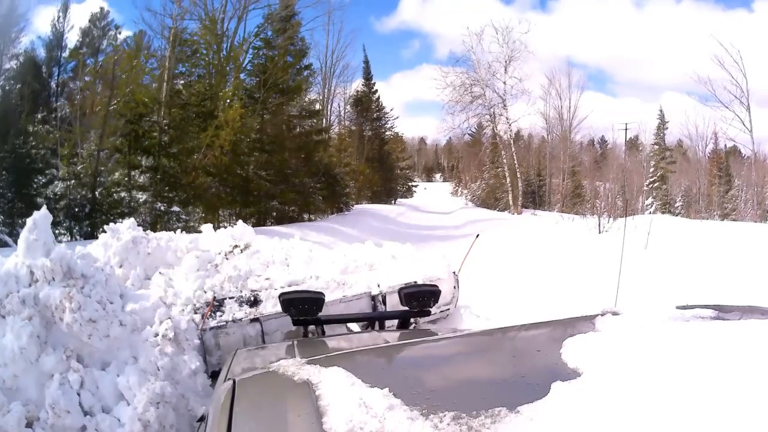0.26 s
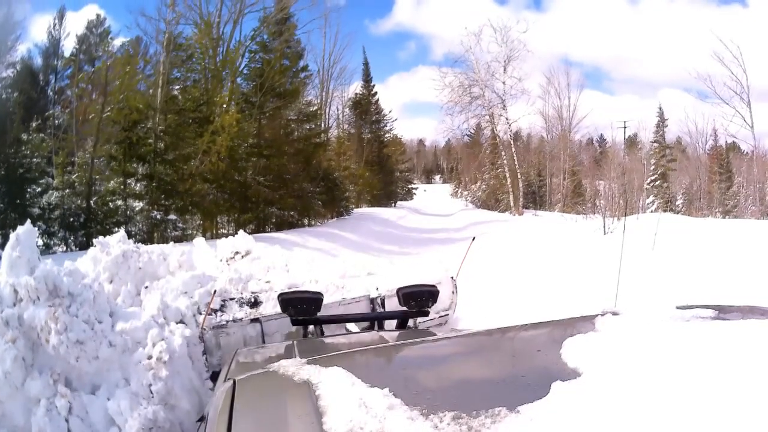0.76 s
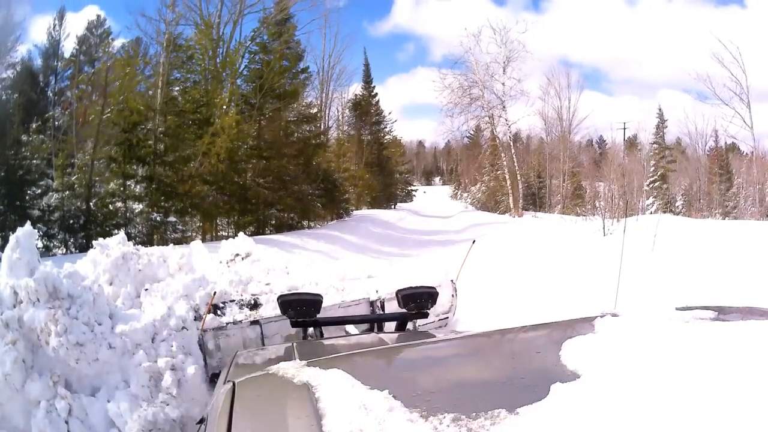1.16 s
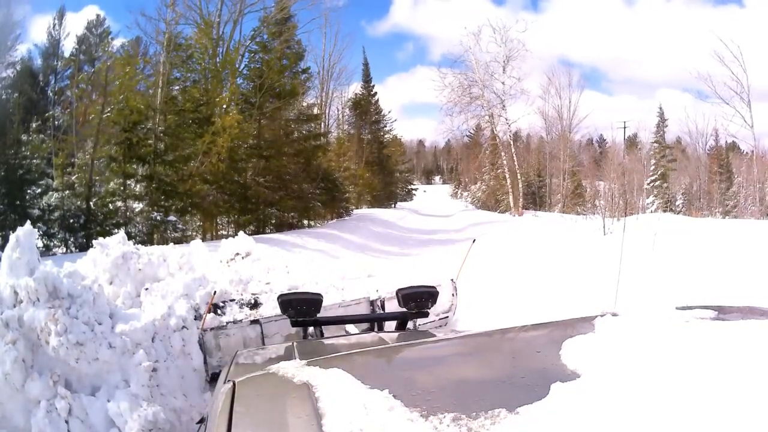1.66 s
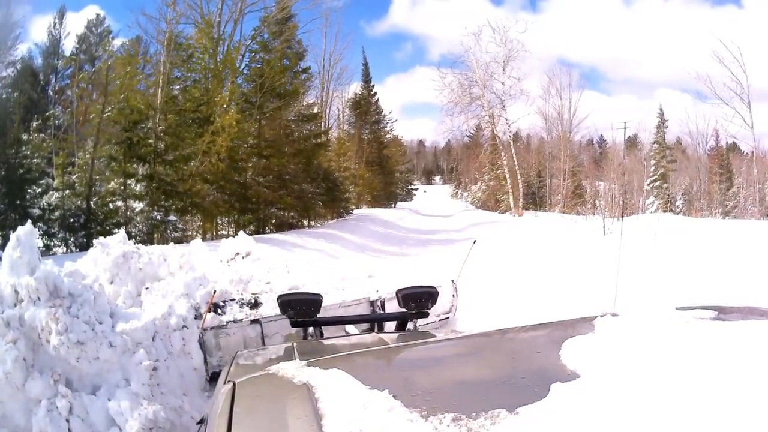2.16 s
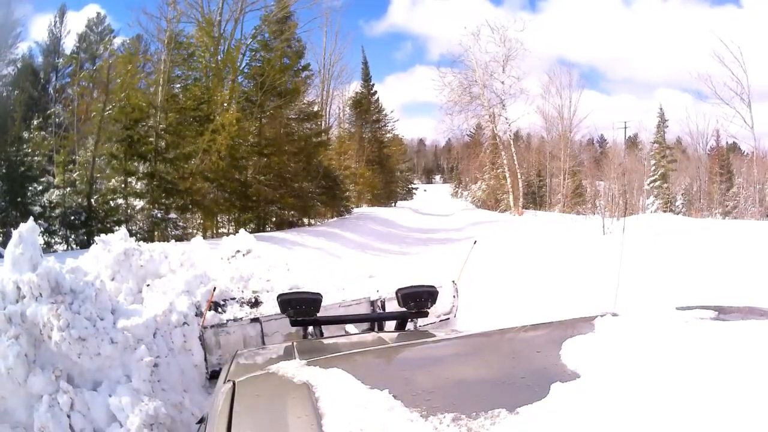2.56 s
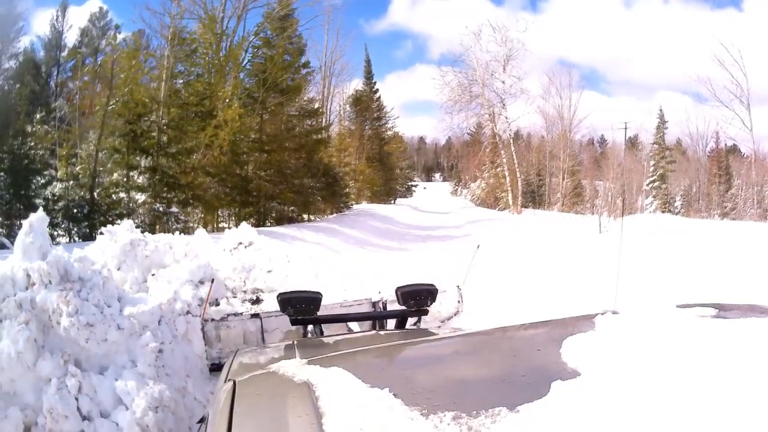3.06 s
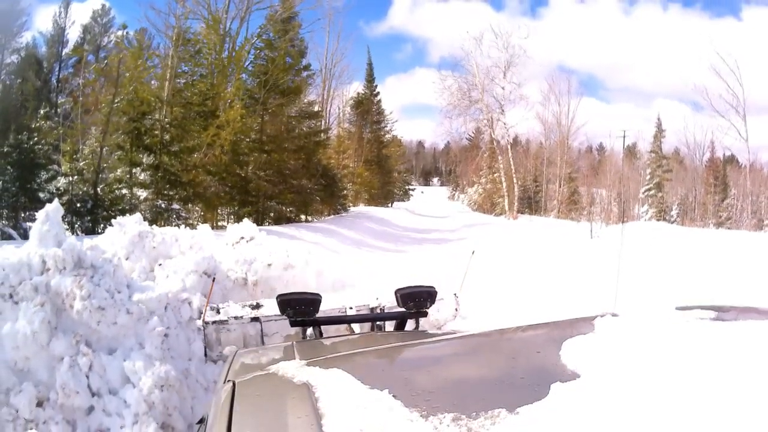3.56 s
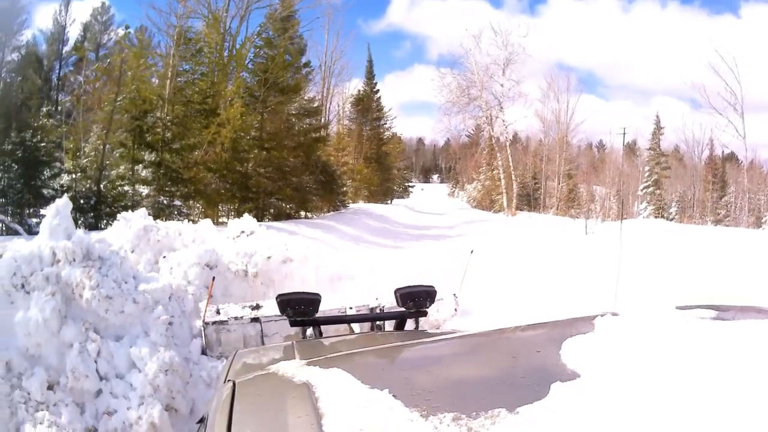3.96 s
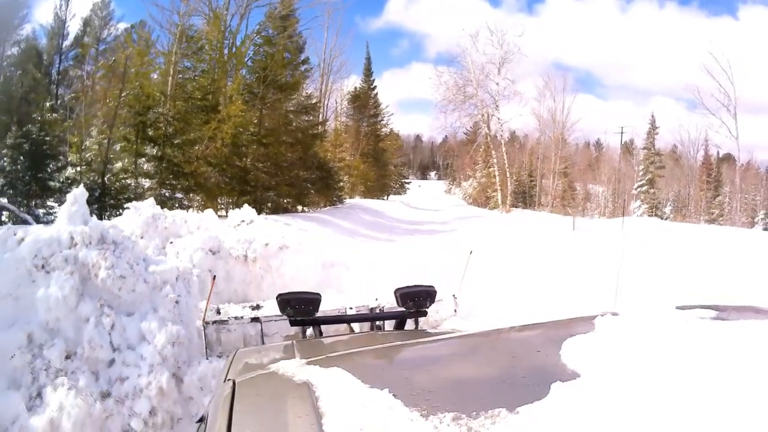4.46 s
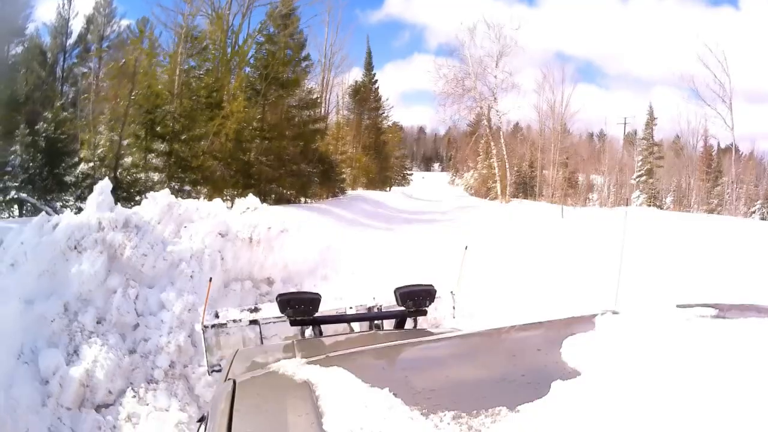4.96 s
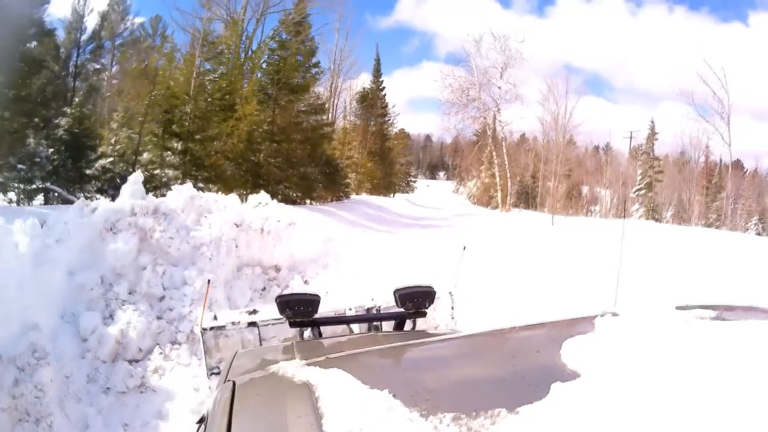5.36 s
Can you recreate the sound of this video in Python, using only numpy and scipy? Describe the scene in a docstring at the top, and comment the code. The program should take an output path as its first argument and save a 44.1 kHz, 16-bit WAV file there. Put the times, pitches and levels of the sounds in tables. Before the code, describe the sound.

A plow truck pushes heavy wet snow, heard in stereo from on board, close to the blade. A deep engine boom and lumpy rumble run throughout, with gritty grinding from the snow. During the first 1.5 seconds the snow collapses in a cluster of crunches and the plow gear gives short knocks. At about 1.6 seconds a dry rub breaks into a brief high squeak. From 2 to 3.6 seconds the blade catches and the truck shakes in four low shudders, amid more crunches and dull slumps of snow. Packed snow gives a short low groan near 3.1 seconds and a higher one near 4.6. The load eases after about 4 seconds, with knocks around 3.7, 4.3 and 4.9 seconds. At 5.2 seconds the engine boom swells again under a few last icy crunches, up to about 5.6 seconds.

```python
"""On board a plow truck labouring in heavy wet snow, close to the blade, in stereo.
From the start the engine booms under a lumpy rumble, snow grinds and collapses in crunches, and
the plow gear knocks. At 1.6 s a dry rub breaks into a squeak. From 2 s the blade catches and the
truck shudders; packed snow sticks, slips and groans near 3.1 s and 4.6 s. The load eases amid
more knocks, then the boom swells at 5.2 s under the last icy crunches."""
import sys
import numpy as np
from scipy import signal
from scipy.fft import rfft, irfft, next_fast_len
from scipy.io import wavfile
from scipy.ndimage import uniform_filter1d

SR = 44100
rng = np.random.default_rng(int(sys.argv[2]) if len(sys.argv) > 2 else 0)


def dump_mix(stems):
    """Bounce the given channels to the path in sys.argv[1] as a 16-bit WAV at rate SR."""
    frames = np.atleast_2d(stems).T  # one column per channel
    limited = np.clip(frames, -1, 1)  # hard clip at full scale
    pcm = np.round(limited * 32767).astype(np.int16)
    wavfile.write(sys.argv[1], SR, pcm)


N = 247842
T = np.arange(N) / SR
SIZE = next_fast_len(N)
HZ = np.fft.rfftfreq(SIZE, 1 / SR)

# steady grinding at the blade, between the crunches: (time [s], level [dB])
GRIND_LEVEL = [(0, -33.5), (.45, -30.5), (1.4, -33.5), (1.9, -30.5), (2.8, -33), (3.4, -38.5), (3.65, -33),
               (4.1, -39), (4.85, -36), (5.15, -41), (5.62, -33)]
# dull body, crunchy middle and bright top of a fracture: (frequency [Hz], level [dB])
BODY_BAND = [(200, 6.5), (350, 3.5), (550, -2), (850, -8), (1300, -7.5)]
MID_BAND = [(650, -3), (1000, -1), (1550, 0.5), (2400, -3.5), (3400, -10), (4600, -15.5)]
TOP_BAND = [(3000, -5), (4500, -2.5), (6500, -3.5), (9000, -3), (11000, -11), (13000, -20), (16000, -31)]


def amp(db):
    """Decibels to gain."""
    return 10 ** (np.asarray(db) / 20)


def unit(x):
    """Scales to rms 1."""
    return x / np.sqrt(np.mean(x ** 2) + 1e-20)


def curve(rows):
    """The columns of a time table at every sample."""
    s, *columns = np.transpose(rows)
    return [np.interp(T, s, c) for c in columns]


def response(points):
    """A table over frequency, read at every bin."""
    hz, db = np.transpose(points)
    return np.interp(np.log(HZ + 1), np.log(hz), db)


def colour(x, db):
    """Filters by a gain in dB for every bin."""
    return irfft(rfft(x, SIZE) * amp(db), SIZE)[..., :N]


def wander(hz):
    """Random drift of rms 1, up to about hz."""
    return unit(colour(rng.standard_normal(N), -10 * np.log10(1 + (HZ / hz) ** 6)))


def noise(spectrum, drive=1):
    """Mid-side stereo noise, shaken by drive, then coloured; it falls steeply outside the spectrum."""
    # stereo width: (frequency [Hz], side level relative to mid [dB])
    width = [(30, -22), (70, -13), (170, -10), (350, -9.5), (700, -2.5), (1400, -7.5), (2800, -8),
             (5600, -6.5), (11000, -23)]
    direct, scattered = rng.standard_normal((2, N)) * drive
    octaves_out = abs(np.log2((HZ + 1) / np.clip(HZ + 1, spectrum[0][0], spectrum[-1][0])))
    db = response(spectrum) - 30 * octaves_out
    mid, side = colour(direct, db), colour(scattered, db + response(width))
    return np.array([mid + side, mid - side]) / np.std(mid)


def steadied(x, seconds):
    """Evens out the slow swells of a noise."""
    span = int(seconds * SR)
    power = uniform_filter1d(x.mean(0) ** 2, span)
    return x / np.sqrt(uniform_filter1d(power, span) + 1e-9)


def patchy(x, depth_db):
    """Every lump rings differently: chance peaks, some hundred Hz wide and about 30 ms long."""
    frames = signal.stft(x, nperseg=256)[2]
    patches = uniform_filter1d(rng.standard_normal(frames.shape[1:]), size=2, axis=0)
    patches = uniform_filter1d(patches, size=10, axis=1)
    gain = unit(amp(depth_db * np.clip(unit(patches), -2, 2)))
    return signal.istft(frames * gain, nperseg=256)[1][:, :N]


def add(mix, s, sound):
    """Mixes a sound in at time s."""
    part = mix[..., max(round(s * SR), 0):][..., :sound.shape[-1]]
    part += sound[..., :part.shape[-1]]


def reflected(x, wet_db, t60):
    """Panels near the microphone return a short scatter of echoes, different on each side."""
    t = np.arange(SR // 10) / SR
    taps = rng.standard_normal((2, len(t))) * (rng.random(len(t)) < .05)
    taps *= amp(-60 * t / t60) * (t > .002)
    taps /= np.linalg.norm(taps, axis=1, keepdims=True)
    return x + amp(wet_db) * signal.oaconvolve(x[None], taps, axes=1)[:, :N]


def truck():
    """Exhaust boom and chassis rumble; firings throb in the growl, and snow churns under the load."""
    # exhaust boom: (time [s], pitch [Hz], level [dB])
    exhaust = [(0, 41.07, -41), (1.3, 54.5, -28), (1.95, 53.76, -21), (2.9, 41.86, -37.5), (3.93, 49, -28),
               (4.85, 55.23, -39), (5.2, 51, -18.5), (5.6, 44.5, -35)]
    # how hard the truck pushes: (time [s], load [dB])
    load = [(0, -3.5), (.15, 2), (.35, -1), (1.1, 0.5), (2.0, 1), (2.3, -1), (2.85, 2), (3.3, -1.5),
            (3.58, -4), (3.78, -1.5), (4.15, -6), (4.75, -4.5), (5.15, -6.5), (5.48, -1.5), (5.62, -9)]
    # masses of snow slump over with a dull swell: (time [s], length [s], peak [dB])
    slumps = [(0.71, 0.084, -20), (1.9, 0.19, -18), (2.536, .16, -14), (2.701, .09, -11.5),
              (2.788, 0.12, -14.5), (3.046, .19, -19.5), (3.283, .16, -20.5), (4.307, 0.06, -16.5),
              (5.242, 0.029, -19)]
    # spectra of chassis, churning snow and engine growl: (frequency [Hz], level [dB])
    rumble_band = [(14, -18), (22, -13), (32, 12.5), (42, 11), (55, 5), (72, -6)]
    churn_band = [(70, 0), (92, 4), (130, 2.5), (180, -2.5), (230, -7.5)]
    growl_band = [(160, -4), (220, 1), (300, 0.5), (360, -2.5), (450, -16)]
    boom_hz, boom_db = curve(exhaust)
    load_db, = curve(load)
    slump = np.zeros(N)
    for s, length, db in slumps:
        add(slump, s, amp(db) * np.sin(np.linspace(0, np.pi, int(length * SR))))
    angle = 2 * np.pi * np.cumsum(boom_hz * (1 + 0.05196 * wander(hz=12.88))) / SR
    boom = amp(boom_db) * np.sqrt(2) * (np.sin(angle) + amp(-28) * np.sin(2 * angle))
    firing = 1 + 0.06 * np.cos(2 * angle)  # two firings to each cycle of the boom
    rumble = amp(-17 + 1.47 * load_db) * steadied(noise(rumble_band), seconds=0.053)
    churn = np.hypot(amp(-22.5 + 0.93 * load_db), slump) * steadied(noise(churn_band), seconds=0.26)
    growl_gain = np.hypot(amp(-24 + 1.22 * load_db), amp(-4) * slump)
    growl = growl_gain * steadied(noise(growl_band, firing), seconds=0.18)
    return boom + rumble + churn + growl


def shudders():
    """The blade catches and the whole truck shakes on its springs for a few slow cycles."""
    # shakes of the truck: (time [s], length [s], peak [dB], frequency [Hz])
    shakes = [(2.065, 0.086, -1.5, 36.6), (2.452, 0.099, -6.5, 44), (2.852, 0.15, -8.5, 40.9),
              (3.343, 0.24, -5.5, 42.85)]
    out = np.zeros(N)
    for s, length, db, hz in shakes:
        t = np.arange(0, length, 1 / SR)
        swell = np.sin(np.pi * (t / length) ** 0.48)  # rises faster than it dies
        add(out, s, amp(db) * swell * np.sin(2 * np.pi * hz * t))
    return out


def grinding():
    """Snow gives way at the blade in uneven lumps: coarse grit under a fine hiss."""
    # spectra of the grit and the hiss: (frequency [Hz], level [dB])
    grit_band = [(250, -3), (400, -2), (520, 0), (720, -7), (1100, -12), (1700, -17), (2600, -22),
                 (4200, -28.5)]
    fizz_band = [(2500, -5), (4000, -7.5), (6200, -5.5), (9000, -5), (11000, -11), (13000, -12),
                 (16000, -14)]
    grind_db, = curve(GRIND_LEVEL)
    crumble = amp(1.8 * wander(hz=25.1))
    grit = amp(grind_db) * noise(grit_band, crumble * amp(0.92 * wander(hz=505)))
    fizz_db = -53.5 + .85 * (grind_db - grind_db.mean())
    fizz = amp(fizz_db) * noise(fizz_band, np.sqrt(crumble) * amp(0.79 * wander(hz=910)))
    return patchy(grit, depth_db=2.5) + fizz


def groans():
    """Packed snow sticks and slips under the load: a few uneven cycles that rise and fall in pitch."""
    # stick-slip bursts: (time [s], length [s], peak [dB], pitch [Hz], pitch arch [share])
    slips = [(3.104, .06, -3.5, 154.8, .3), (4.612, 0.027, -4.5, 348.6, .12),
             (4.631, 0.038, -15, 410.5, .1)]
    out = np.zeros(N)
    for s, length, db, hz, arch in slips:
        bow = np.sin(np.linspace(0, np.pi, int(length * SR)))
        uneven = .06 * wander(hz=80)[:len(bow)]
        angle = 2 * np.pi * np.cumsum(hz * (1 + arch * (bow - .5) + uneven)) / SR
        add(out, s, amp(db) * bow * (np.sin(angle) + amp(-28) * np.sin(2 * angle)))
    return reflected(out, wet_db=-7.5, t60=0.22)


def squeak():
    """A dry rub catches and sings, then breaks into a rougher chirp; jitter blurs the partials."""
    # course of the rub: (time [s], pitch [Hz], relative level [dB])
    rub = [(1.615, 2950, -34), (1.63, 3000, -15), (1.645, 3320, -17), (1.655, 3090, -27), (1.666, 2983, -9),
           (1.698, 3200, -47), (1.703, 4220, -18), (1.712, 4224, -15.5), (1.735, 3620, -43)]
    # the higher chirp is rougher: (pitch [Hz], jitter [share])
    roughness = [(3100, .025), (4200, 0.087)]
    # resonances that weight the partials: (frequency [Hz], gain [dB])
    resonances = [(3000, 3), (4200, 5.5), (6200, 5.5), (7800, -4), (9400, 0.5), (12000, -15), (16000, -35)]
    hz, db = curve(rub)
    jitter = np.interp(hz, *np.transpose(roughness)) * wander(hz=890)
    angle = 2 * np.pi * np.cumsum(hz * (1 + jitter + .015 * wander(hz=121))) / SR
    tone = np.zeros(N)
    for k in range(1, 5):
        partial_db = np.interp(k * hz, *np.transpose(resonances)) + 4.2 * wander(hz=300)
        tone += amp(partial_db) * np.sin(k * angle)
    rubbing = (T > rub[0][0]) & (T < rub[-1][0])
    return reflected(amp(db - 4.5) * unit(tone) * rubbing, wet_db=-6.5, t60=0.042)


def knocks():
    """Blows ring damped modes of the plow gear; hard ones reach the upper modes and add a crack."""
    # blows on the gear: (time [s], level [dB], lowest mode [Hz], hardness [dB])
    blows = [(.326, -8.5, 1760, -23), (0.326, -9.5, 604, -3.5), (.449, -14, 497, -0.5), (.83, -6, 560, -24),
             (1.101, -5, 500, -8), (1.116, -28, 1240, -4), (1.416, -11, 460, -24),
             (2.379, -12.5, 1480, -6.5), (2.481, -13.5, 488, -6.5), (3.316, -3.5, 209, -24),
             (3.695, -4, 866, -2), (3.7, -8.5, 213, -20), (3.739, -11.5, 668, -4), (4.316, -15.5, 1567, 1),
             (4.317, -11, 822, -2.5), (4.345, -17.5, 603, -3), (4.849, -8.5, 483, -7),
             (4.869, -13.5, 724, -3.5), (4.86, -5, 224, -18), (4.919, -17, 1100, -10),
             (4.98, -6.5, 384, -8)]
    # modes of the gear: (frequency [multiple of the lowest], relative level [dB])
    modes = [(1, 2), (1.75, -5), (2.05, -20), (2.75, -9), (4.25, -21.5)]
    out, cracks, t = np.zeros(N), np.zeros(N), np.arange(SR // 6) / SR
    ratios, modes_db = np.transpose(modes)[:, :, None]
    upper = ratios > 1
    for s, db, hz, hard_db in blows:
        t60 = 0.031 * (500 / hz) ** 0.67  # higher knocks die sooner
        detune = 0.07 * rng.standard_normal(ratios.shape) * upper  # each blow lands on another spot
        mode_hz = hz * ratios * (1 + detune)
        ring = (amp(modes_db + hard_db * upper - 60 * t / t60) * np.sin(2 * np.pi * mode_hz * t)).sum(0)
        add(out, s, amp(db) * ring * (1 - np.exp(-t * hz / 0.7)))  # low knocks build up more slowly
        add(cracks, s, amp(db + hard_db - 60 * t / 0.047) * (1 - np.exp(-t / 0.001)))
    crack = amp(-4.5) * noise(BODY_BAND) + amp(-16.5) * noise(MID_BAND) + amp(-24.5) * noise(TOP_BAND)
    return reflected(out, wet_db=-1, t60=0.045) + cracks * crack


def crunching():
    """Snow collapses and slides in clouds of tiny fractures; icy snaps are thinner, brighter, shorter."""
    # short collapses: (time [s], level [dB], iciness [dB], where 0 is wet and dull)
    crunches = [(0.17, -20, 10), (0.29, -19.5, -0.5), (.34, -13, 7.5), (0.371, -15.5, 2.5),
                (.427, -17, 3.5), (0.473, -14, -2), (.656, -21, -1.5), (.679, -24, -7.5),
                (0.765, -14.5, -1), (.93, -25, 0), (.96, -21, -6), (1.056, -13, -3), (1.104, -18, -6),
                (1.115, -12, 4.5), (1.821, -19, 7.5), (2.067, -19, -4.5), (2.13, -30, 20.5),
                (2.224, -18.5, 0), (2.257, -21.5, 3), (2.378, -14, 1), (2.547, -20, -3.5),
                (2.643, -22.5, -2.5), (2.78, -23.5, 5), (2.848, -22.5, -1), (3.076, -14, 0),
                (3.558, -21.5, -1.5), (3.593, -23, 2), (3.956, -24, 3.5), (4.174, -27, 4.5),
                (4.227, -19, 1), (4.578, -26, 10), (5.034, -45, 27.5), (5.235, -18, 13.5),
                (5.345, -27.5, 3), (5.524, -13, 13)]
    # slides of snow: (time [s], length [s], level [dB], relative treble [dB])
    scrapes = [(0.019, 0.051, -30, -13.5), (0.924, 0.04, -25, -20), (1.065, 0.036, -44, 8.5),
               (1.411, 0.072, -28, -3.5), (1.591, 0.045, -24.5, 1.5), (1.629, 0.071, -30, 3),
               (1.696, 0.03, -49.5, 21), (3.081, 0.042, -35.5, -19), (4.238, 0.044, -31, -22),
               (4.866, 0.028, -26, -20), (5.121, 0.16, -48.5, 0), (5.236, .035, -31, -26),
               (5.523, 0.029, -23, -23)]
    power = np.zeros((3, N))  # body, middle, top
    t = np.arange(SR // 5) / SR
    grind_db, = curve(GRIND_LEVEL)
    crumbs = [(when * N / SR, grind_db[int(when * N)] + 1.5 + 8 * size, 9.5 * ice)
              for when, size, ice in rng.random(size=(48, 3))]
    for s, db, ice_db in crunches + crumbs:  # small crumbs fall at random among the big crunches
        bands_db = db + np.array([[-3.5 - 0.57 * ice_db], [-10.5], [-25.5 + ice_db]])
        pace = amp(.3 * ice_db) * np.array([[1], [1], [1.16]])  # the top dies fastest
        after = np.maximum(t * pace - .006, 0)  # the collapse lasts a moment, then dies away
        attack = 1 - np.exp(-t / 0.00049)
        decay = amp(-60 * after / 0.094) + amp(-24 - 60 * after / 0.11)
        add(power, s - .001, (amp(bands_db) * attack * decay) ** 2)
    for s, length, db, treble_db in scrapes:
        slide = signal.windows.tukey(int(length * SR), .5)
        add(power, s, (amp(db + np.array([[3], [0], [treble_db]])) * slide) ** 2)
    grains = amp(2.5 * wander(hz=855) + wander(hz=117))
    bands = (BODY_BAND, MID_BAND, TOP_BAND)
    fractures = sum(np.sqrt(p) * noise(band, grains) for p, band in zip(power, bands))
    return patchy(fractures, depth_db=3.5)


def scene():
    """All sources at the on-board microphone, the bass leaning left and the crunching right."""
    # stereo balance: (frequency [Hz], left minus right [dB])
    lean = [(40, 1.5), (90, 2.5), (180, 1), (350, -3), (1400, -2), (5600, -0.2), (10000, 0)]
    mix = truck() + shudders() + grinding() + crunching() + knocks() + groans() + squeak()
    return colour(mix, np.array([[.5], [-.5]]) * response(lean))


def record(dry):
    """The microphone chain rounds off the loudest peaks and cuts the top above 15850 Hz."""
    rounded = dry / (1 + dry ** 8) ** (1 / 8)
    lowpass = signal.firwin(511, 15850, window=("kaiser", 9), fs=SR)
    return signal.oaconvolve(rounded, lowpass[None], "same")


dry = scene()
out = record(dry)
dump_mix(out)
```